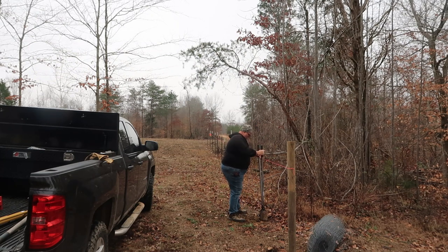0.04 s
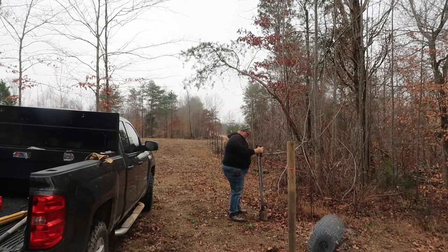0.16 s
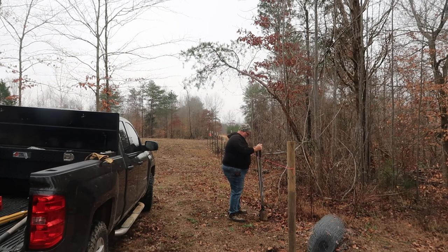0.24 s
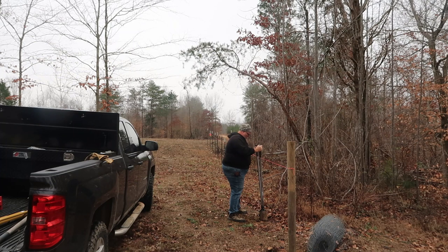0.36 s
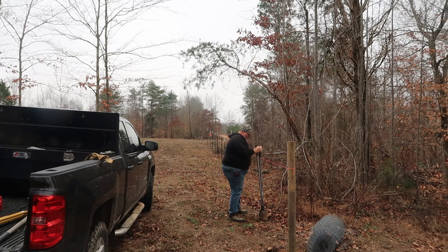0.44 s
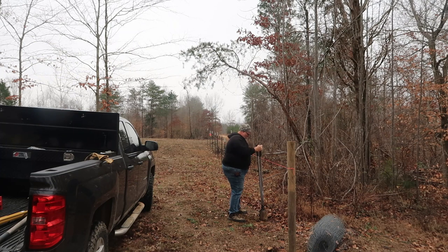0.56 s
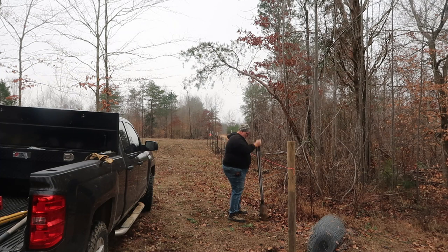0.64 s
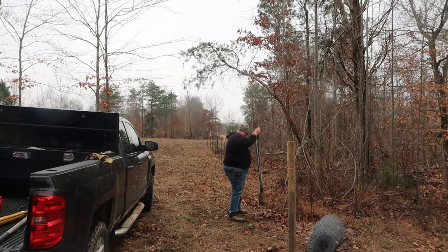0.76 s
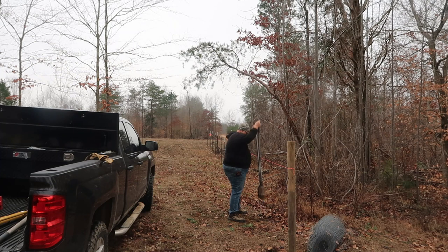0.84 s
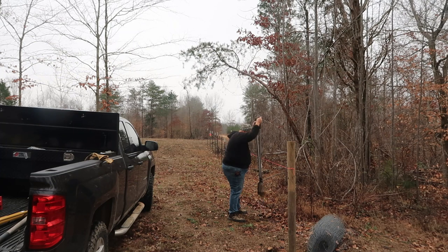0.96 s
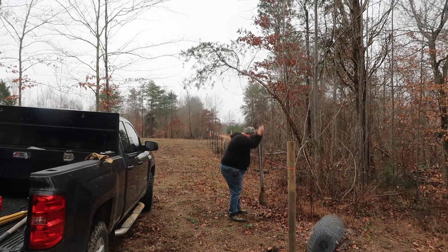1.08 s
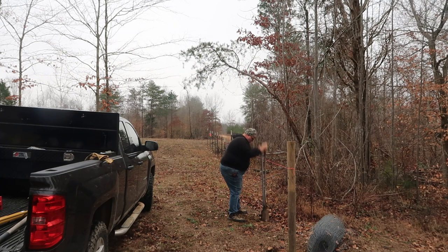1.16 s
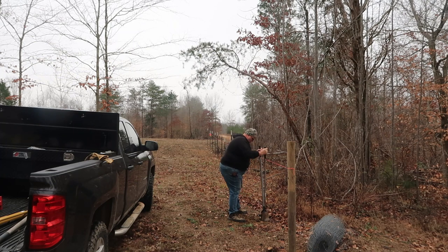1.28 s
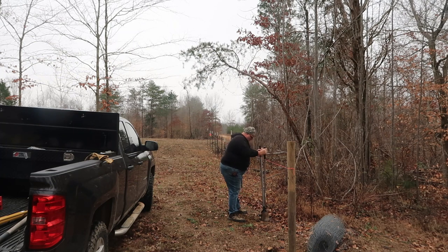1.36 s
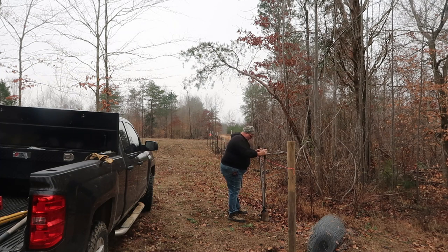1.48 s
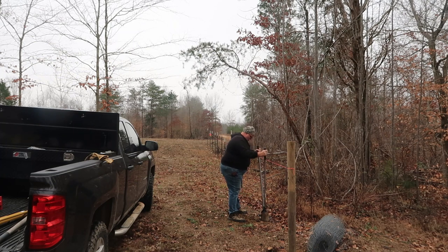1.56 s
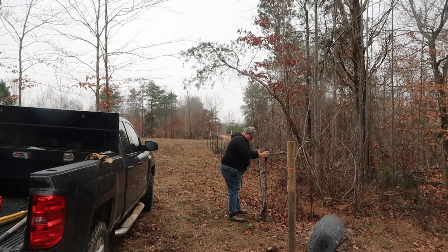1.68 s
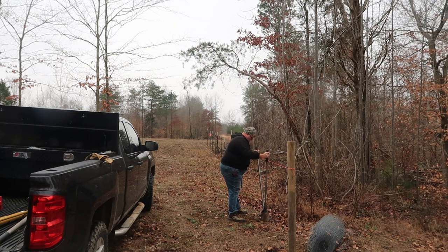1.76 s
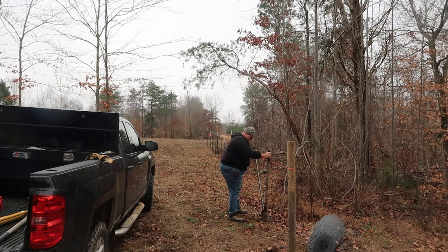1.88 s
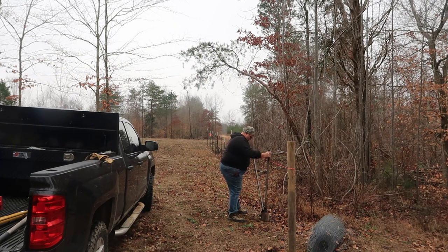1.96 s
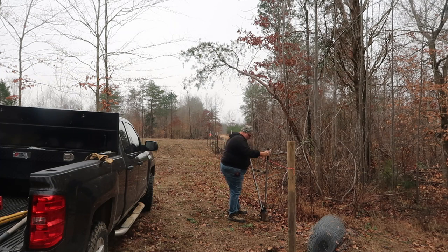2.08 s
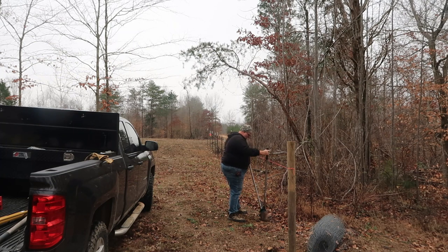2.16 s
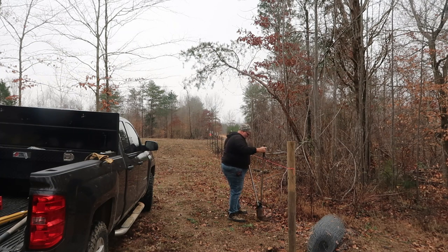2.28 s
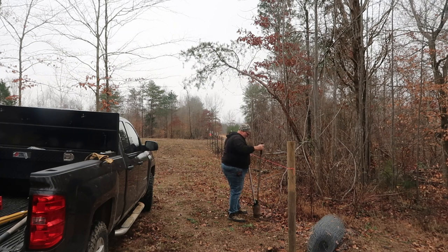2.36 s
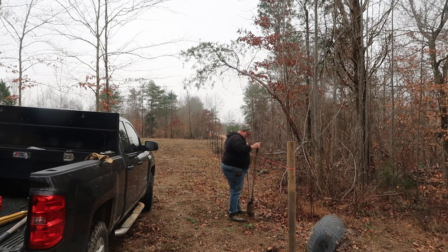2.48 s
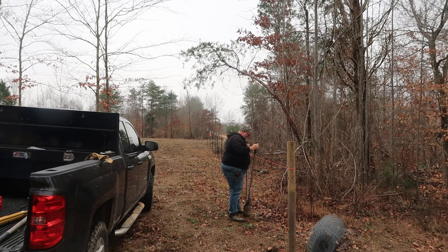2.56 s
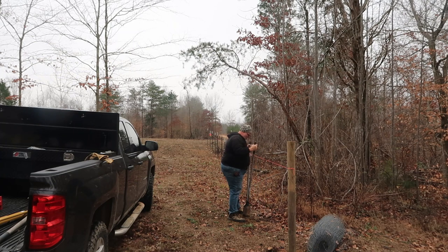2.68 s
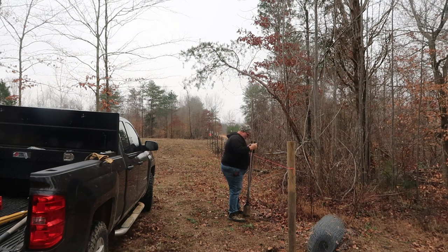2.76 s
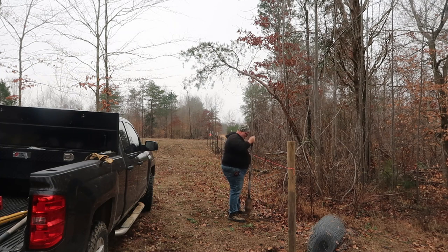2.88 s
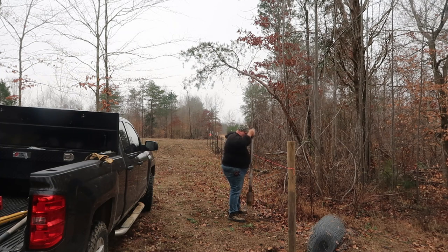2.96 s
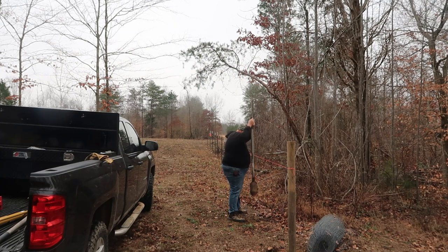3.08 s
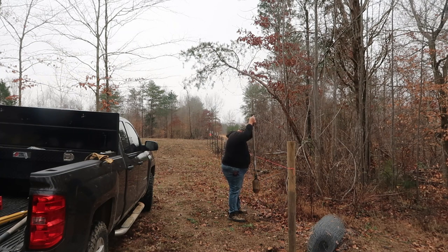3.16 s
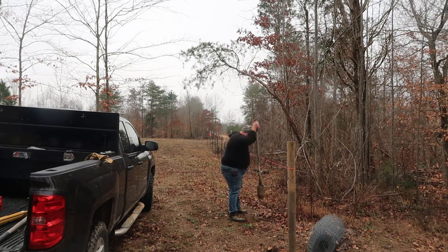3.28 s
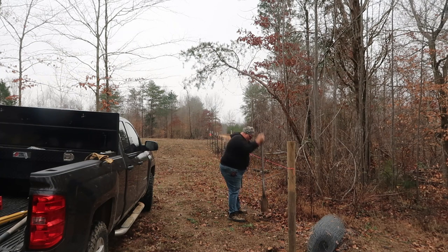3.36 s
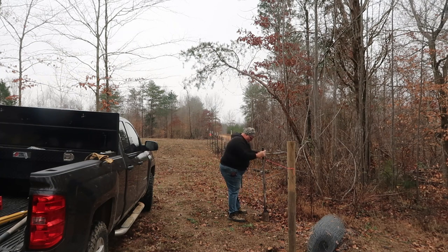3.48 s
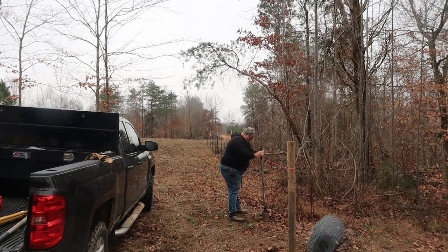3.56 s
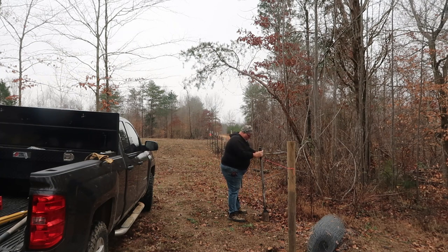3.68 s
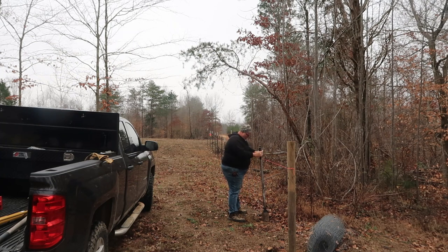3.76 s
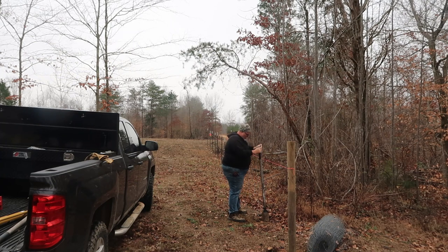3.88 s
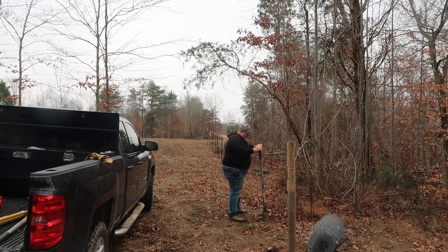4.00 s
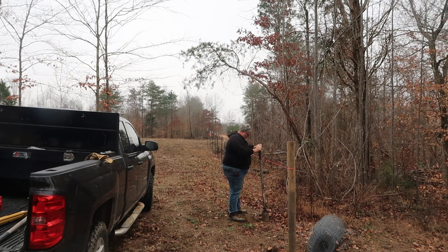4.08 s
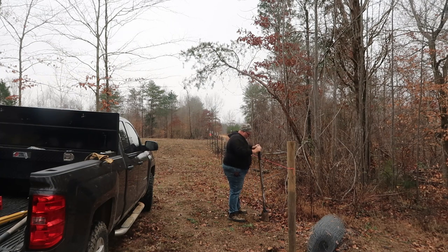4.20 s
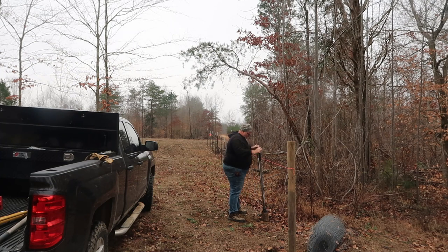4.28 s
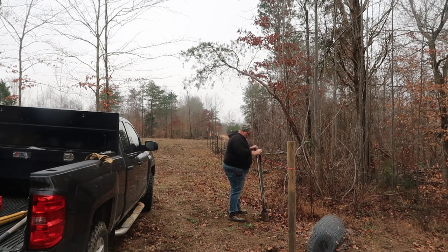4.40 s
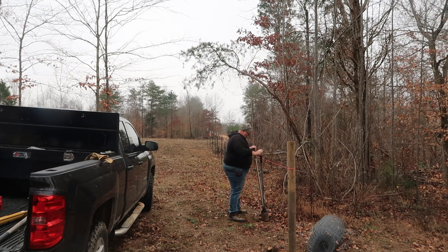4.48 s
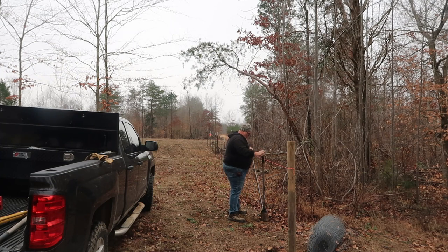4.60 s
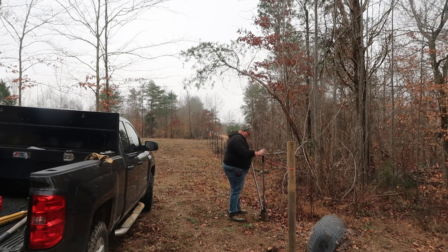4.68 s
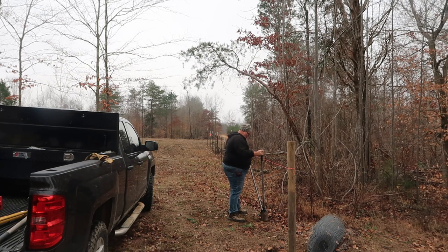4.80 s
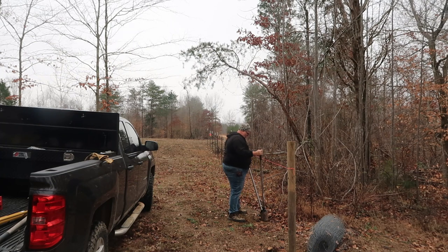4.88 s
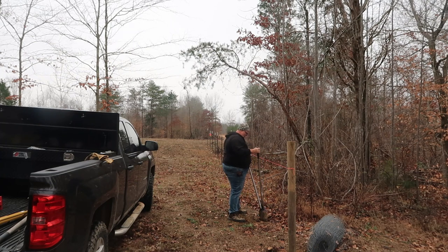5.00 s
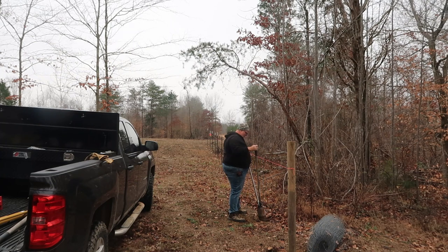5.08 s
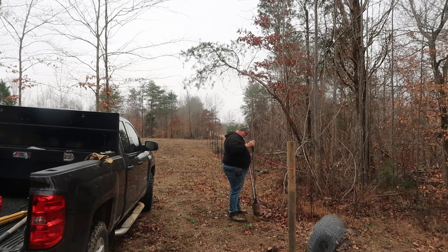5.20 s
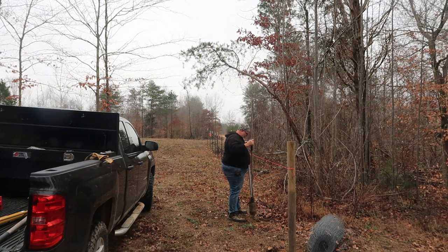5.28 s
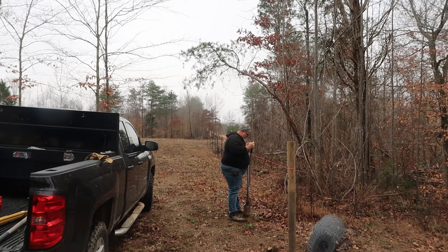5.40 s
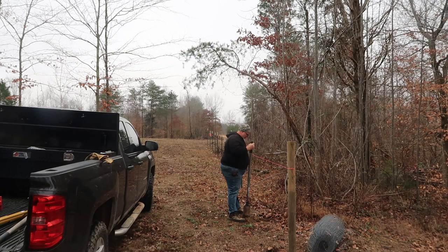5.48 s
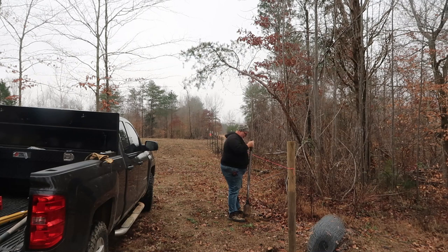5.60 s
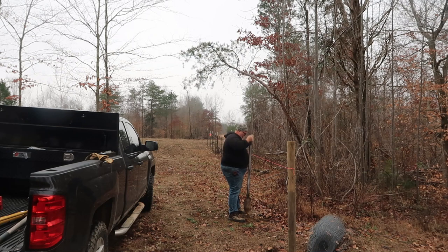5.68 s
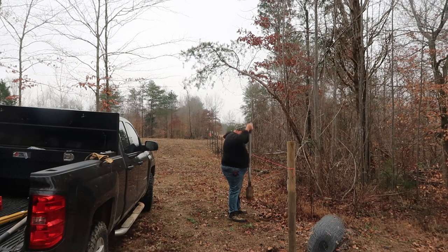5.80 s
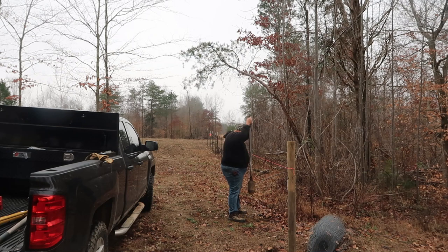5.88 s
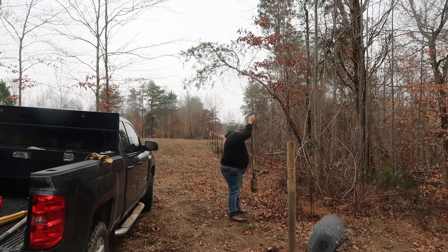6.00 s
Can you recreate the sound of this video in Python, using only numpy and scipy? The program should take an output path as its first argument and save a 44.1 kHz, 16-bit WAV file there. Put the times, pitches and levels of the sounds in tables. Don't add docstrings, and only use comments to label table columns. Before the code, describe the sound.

Sharp, gritty metal-on-stone blows at uneven intervals, each with short muffled blade rings, a low ground thump and a quick scattered echo from trees. After the blows the tool knocks and drags through soil, busiest after the deep third impact. A far bird whistles faintly over soft wind rumble and airy hush. Heard from several metres in open air, nearly central, with the loudest blow slightly clipped and the background dipping afterwards.

```python
import sys
import numpy as np
from scipy import signal
from scipy.fft import rfft, irfft, next_fast_len
from scipy.io import wavfile
from scipy.ndimage import uniform_filter1d

SR = 44100
rng = np.random.default_rng(int(sys.argv[2]) if len(sys.argv) > 2 else 0)


def unload_wav(signal):
    wavfile.write(
        sys.argv[1],
        SR,
        np.round(np.clip(np.atleast_2d(signal).T, -1, 1) * 32767).astype(np.int16),
    )


def ratio(d):
    e = np.asarray(d, float) / 20
    return 10 ** e


N = 266364
LEAD = SR // 5

# t/s, body peak level/dB, blade level over body/dB, time to the peak/s, drop after it/dB
DRY_BLOWS = [
    (-.06, 2.5, -3, .004, -11),
    (1.3028, 3, 2, .004, -10),
]
DEEP_BLOWS = [
    (3.551, -4, -3, .007, -18),
]
STABS = [
    (2.707, -18.5, 4, .013, -16),
    (5.548, -19.5, 5.5, .006, -12),
]
# body build-up/dB, settling time/s, crumble/(dB per s), grit level/dB, grit change/(dB per s)
DRY_SOIL = (-4, .0045, -300, -4, 60)
DEEP_SOIL = (-8, .006, -170, 2, 40)
LOOSE_SOIL = (-8, .010, -150, -4, 120)
# t/s, body level/dB, blade level over body/dB, length/s
GRAZES = [
    (2.683, -49.5, 9, .006),
    (2.692, -43, 10, .010),
    (3.544, -35, 9.5, 0.016),
    (5.53, -44, 9, .015),
]
# t/s, body peak level/dB, blade level over body/dB, grit level/dB
KNOCKS = [(0.21, -25, 1, -18), (0.233, -24.5, -12, -8), (1.895, -29, -6, -14), (1.919, -10.5, -20, -8),
          (1.933, -20.5, -15, -12), (2.060, -33.5, 3, -6), (2.229, -43, -7, -18), (4.218, -24, -15, -12),
          (4.278, -15, -6.5, -13), (4.334, -16.5, -2.5, -10), (4.345, -21, -12, -15), (4.356, -21, -9, -22),
          (4.421, -30, 1, -8), (4.456, -12, -14, -10), (4.463, -20, -1, -10), (4.499, -19.5, -22, -12),
          (4.513, -15.5, -19, -8), (4.525, -23, -15, -8), (4.539, -15.5, -7.5, -10), (4.555, -22, -10, -10),
          (4.577, -18.5, -12.5, -6), (4.702, -27.5, 1, -9)]
# t/s, body level/dB, blade level over body/dB
SCRAPES = [(.203, -29.5, -5), (.245, -39, -12), (.667, -29, -1), (.682, -35.5, -1.5), (1.075, -40, -25),
           (1.105, -45, -15), (1.885, -34, -7.5), (2.185, -52, 7), (2.245, -40, -4.5), (2.915, -48, 5.5),
           (3.145, -52.5, 3.5), (3.79, -48, -10), (4.365, -26.5, -4.5), (4.388, -47, 8), (4.657, -23, -9),
           (4.684, -40.5, 5), (5.075, -48.5, 5)]
# start t/s, length/s, body # level/dB, blade level over body/dB, change to the end/dB
DRAGS = [
    (1.143, 0.16, -54.5, 0.5, 10.5),
    (1.948, 0.089, -33, -13, -1),
    (2.14, 0.12, -65.5, 9.5, 4.5),
    (3.458, 0.06, -53.5, -9, 2),
    (4.227, 0.048, -42.5, -4, -5),
    (4.292, .04, -38, -2, 17),
    (4.428, .07, -33, -3.5, 2),
    (4.503, 0.076, -29.5, -13.5, 4),
    (4.583, 0.081, -35, -13, 0),
    (4.988, 0.074, -65, 12, 2),
]
# f/Hz, level/dB, time to fall 60 dB/s
BLADES_DRY = [(1141, -13, 0.047), (1247, -14, 0.024), (1386, -11, 0.032), (1979, -13.5, 0.044),
              (2158, -11, 0.055), (2470, -7.5, .03), (2890, -4.5, 0.04), (3190, 1.5, 0.014),
              (3500, -2, 0.028), (4343, -12, 0.055), (4580, -11, 0.0252), (5230, -20.5, 0.043),
              (7150, -22, 0.03)]
BLADES_DEEP = [(914, 5, 0.009), (1374, -8, 0.033), (1590, -7, 0.025), (2170, -5, 0.037), (2620, -8, 0.015),
               (2790, -5, 0.031), (3040, 1, 0.015), (3500, -0.5, 0.014), (3930, -8, 0.031),
               (4460, -7, 0.027), (4910, -12, 0.023), (7160, -17, 0.017)]
BLADES_STAB = [(1133, -8, 0.013), (1395, -8, 0.022), (1750, -6, 0.023), (1937, -8.5, 0.025),
               (2055, 0.5, 0.018), (2583, 2, 0.018), (2820, -6, 0.051), (3233, -4.5, 0.023),
               (3510, -14, 0.075), (3826, -14.5, 0.025), (4360, -16, 0.061), (7220, -24, 0.012)]
BLADES_LOOSE = [(1140, 0, 0.019), (1390, 2, 0.022), (1681, -3.5, 0.042), (1900, -2, 0.044),
                (2360, 1, 0.021), (2530, 0, 0.027), (2868, -3.5, 0.029), (3080, -3.5, .02),
                (3320, -4, 0.028), (3750, -6, .02), (4240, -7, 0.022), (4160, -18, .025)]
# f/Hz, level/dB, time to fall 60 dB/s
BODY = [(255, -10, 0.048), (315, -10, 0.08), (494.2, -3.5, 0.062), (546, 4, 0.0098), (698, -0.5, 0.05),
        (804, 4.5, 0.027)]
# t/s, pitch factor
LOAD = [(0, 0.91), (1.3, 1.0), (1.9, 0.98), (2.0, 0.91), (2.2, 0.97), (2.7, .93), (3.55, .98), (4.22, 0.82),
        (4.28, 1.02), (4.45, .95), (4.62, 0.883), (4.68, 1.036), (5.55, 0.97)]
# f/Hz, level/dB
CRACK = [(100, -45), (250, -17), (1000, -9), (3000, -1.5), (4600, -4), (6000, -9), (8000, -12.5),
         (10000, -25), (13000, -23.5), (16000, -32)]
# f/Hz, level/dB
GRIT = [(100, -50), (250, -22), (1000, -3), (3000, 0), (4600, -4), (5400, -16), (7500, -16), (10000, -26),
        (12000, -24), (16000, -34)]
# t/s, level/dB, f/Hz, time to fall 60 dB/s
SHAFT = [
    (-.02, -37, 577, 0.66),
    (1.312, -34, 587, 0.23),
    (3.565, -38, 575, 0.26),
]
# t/s, peak level/dB, f/Hz, time to fall 60 dB/s
THUMPS = [
    (-.03, -26.5, 84, 0.29),
    (1.313, -15, 79.3, 0.28),
    (3.569, -5.5, 78.6, 0.086),
    (3.595, -27, 75, 0.46),
    (3.64, -47.5, 136.6, 0.61),
    (4.33, -41, 88, 0.27),
    (5.559, -43.5, 75.7, 0.18),
]
# f/Hz, level/dB
SPRAY = [(100, -26.5), (300, -4), (700, -1.5), (1500, -2), (3000, -2), (5000, -10), (8000, -13),
         (10000, -35), (16000, -51.5)]
# f/Hz, time to fall 60 dB/s
TREES = [(100, .3), (400, 0.93), (1500, 0.6), (4000, 0.79), (8000, 0.52), (15000, 0.21)]
# f/Hz, likeness (1 = same)
TREES_SAME = [(60, 1), (180, 0.5), (550, 1), (1650, 0.93), (4970, 0.94), (15000, 0.082)]
# start t/s, length/s, first pitch f/Hz, rise share, top level/dB
BIRD = [
    (.87, .062, 1360, .18, -57),
    (.942, .05, 1415, .01, -51.5),
    (1.228, .055, 1370, .17, -52),
    (2.297, .12, 1334, 0.18, -55),
    (2.969, 0.03, 1450, -.06, -57),
    (2.16, .11, 2480, .012, -61),
    (5.0, 0.14, 2470, 0.015, -61),
]
# f/Hz, level/dB per Hz
WIND = [(15, -22), (30, 5), (50, 4), (65, 9.5), (100, -2.5), (150, -6), (250, -37)]
# t/s, level/dB
GUSTS = [(0, -53), (.6, -56.5), (1, -53.5), (1.5, -56), (2.4, -52.5), (3.5, -54.5), (4.5, -52.5),
         (6.04, -54.5)]
# f/Hz, level/dB per Hz
AIR = [(71, -32.5), (120, -9.5), (250, -7.5), (500, -10), (1280, -15), (4550, -23), (10300, -38.5),
       (13400, -43.5), (15800, -58)]
# f/Hz, likeness (1 = same, below 0 = opposed)
AIR_SAME = [(60, 1), (180, 0.26), (550, -0.06), (1650, 0.27), (4970, -0.18), (15000, -0.4)]


def bites(blows, soil):
    build_db, settle_s, crumble_db_per_s, grit_db, grit_db_per_s = soil
    gap = .004 * 1.35 ** np.arange(7)
    t = np.cumsum(gap) - gap
    rows = []
    for s, db, blade_db, peak_s, drop_db in blows:
        short_db = build_db * np.maximum(1 - t / peak_s, 0)
        after = np.maximum(t - peak_s, 0)
        settled = 1 - np.exp(-(after / settle_s) ** 2)
        body_db = db + short_db + drop_db * settled + crumble_db_per_s * after
        over_db = blade_db - .5 * short_db - 70 * after
        rows += zip(s + t, body_db, over_db, .72 * gap, grit_db + grit_db_per_s * t)
    return rows


def slips(grit_db):
    part = np.arange(4) / 4
    rows = []
    for s, length, db, blade_db, change_db in DRAGS:
        early, strong = rng.uniform(-1, 1, (2, 4))
        start = s + length * (part + 0.069 * early)
        body_db = db + change_db * part + 6 * strong
        rows += [(a, b, blade_db, .7 * length / 4, grit_db) for a, b in zip(start, body_db)]
    return rows


def contacts(rows, blades, stones, spread_db, soft):
    out, bare = np.zeros((2, N + LEAD))
    grit = colour(stones)
    for s, body_db, blade_db, length, grit_db in rows:
        t = np.arange(3000) / SR / np.clip(length, .0005, .03)
        side, size, chance = rng.random((3, 3000))
        sign = np.sign(side - .5)
        clicks = sign * ratio(-3.0 * np.log(size + 0.0017)) * (chance < .25)
        clicks[0] = 3.6 * (1 - soft)
        clicks *= np.exp(-(t - soft) ** 2 * (1 + soft))
        pitch = np.interp(s, *np.transpose(LOAD))
        body = ring(np.multiply(BODY, [pitch, 1, 1]), spread_db)
        blade = ring(blades, spread_db)
        over_db = body_db + blade_db
        for answer, db in (body, body_db), (blade, over_db), (grit, over_db + grit_db):
            sound = signal.fftconvolve(clicks, answer)[:5000]
            add(out, s, ratio(db) * sound / abs(sound).max())
        add(bare, s, ratio(body_db + max(blade_db, 0)) * sign[:1])
    return np.array([out, bare])


def ring(modes, spread_db):
    hz, db, t60 = np.transpose(modes)[:, :, None]
    t60 = np.minimum(t60, .07)
    louder, higher = rng.standard_normal((2, len(modes), 1))
    t = np.arange(3072) / SR
    level = ratio(db + spread_db * louder - 60 * t / t60)
    sines = level * np.sin(2 * np.pi * hz * (1 + 0.017 * higher) * t)
    return sines.sum(0) * (1 - np.exp(-(t / 0.00015) ** 2))


def colour(points):
    gain = np.log(ratio(read(points, abs(np.fft.fftfreq(2048, 1 / SR)))))
    return np.fft.ifft(np.exp(signal.hilbert(gain).conj())).real[:512]


def tool_strikes():
    dry_blows = contacts(bites(DRY_BLOWS, DRY_SOIL), BLADES_DRY, CRACK, 0.91, soft=0)
    deep_blows = contacts(bites(DEEP_BLOWS, DEEP_SOIL), BLADES_DEEP, CRACK, 0.94, soft=0.17)
    grazes = [(*row, -2) for row in GRAZES]
    stabs = contacts(bites(STABS, LOOSE_SOIL) + grazes, BLADES_STAB, GRIT, 1.2, soft=0.5)
    knock_s, scrape_s, scrape_grit_db = .0016, .0098, -3
    knocks = [(*row, knock_s, grit_db) for *row, grit_db in KNOCKS]
    scrapes = [(*row, scrape_s, scrape_grit_db) for row in SCRAPES] + slips(scrape_grit_db)
    loose = contacts(knocks, BLADES_LOOSE, GRIT, 1.6, soft=0)
    loose += contacts(scrapes, BLADES_LOOSE, GRIT, 1.6, soft=.8)
    tool, bare = dry_blows + deep_blows + stabs + np.roll(loose, 90, axis=1)
    no_bass = signal.butter(5, 200, "high", fs=SR, output="sos")
    return signal.sosfilt(no_bass, tool), bare


def shaft():
    out, t = np.zeros(N + LEAD), np.arange(SR // 2) / SR
    for s, db, hz, t60 in SHAFT:
        waver = 1 + .5 * evened(uniform_filter1d(rng.standard_normal(len(t)), size=700))
        add(out, s, ratio(db - 60 * t / t60) * waver * np.sin(2 * np.pi * hz * t))
    return out


def ground():
    out, t = np.zeros(N + LEAD), np.arange(SR // 2) / SR
    for s, db, hz, t60 in THUMPS:
        turns = hz * (t + 0.0032 * (1 - np.exp(-t / 0.012)))
        uneven = evened(uniform_filter1d(rng.standard_normal(len(t)), size=900))
        lumps = 1 + 0.35 * uneven * np.minimum(t / 0.039, 1)
        level = ratio(db - 60 * t / t60) * (1 - np.exp(-t / 0.00055))
        add(out, s, level * lumps * np.sin(2 * np.pi * turns))
    return out


def ports(x, lag_samples, right_db):
    size = next_fast_len(len(x))
    turn = np.exp(-1j * np.pi * np.fft.rfftfreq(size) * lag_samples)
    sides = np.array([turn / ratio(right_db), ratio(right_db) / turn])
    return irfft(rfft(x, size) * sides, size)[:, :len(x)]


def trees(x):
    taps = np.zeros((2, SR))
    at = np.arange(700, SR - 20, 20) + rng.integers(0, 20, (2, (SR - 701) // 20))
    np.put_along_axis(taps, at, rng.choice([-1., 1.], at.shape), 1)
    hz, t, z = signal.stft(taps, SR, nperseg=256)
    like = np.clip(read(TREES_SAME, hz), -1, 1)[:, None]
    z[1] = like * z[0] + np.sqrt(1 - like ** 2) * z[1]
    fade = ratio(-60 * t / read(TREES, hz)[:, None])
    tail = signal.istft(z * fade, SR, nperseg=256)[1]
    return signal.fftconvolve(x[None], tail / np.linalg.norm(tail[0]), axes=1)[:, :len(x)]


def bird():
    out = np.zeros(N + LEAD)
    for s, length, hz, rise, db in BIRD:
        flutter = uniform_filter1d(rng.standard_normal(SR // 4), size=200)
        t = np.arange(0, length, 1 / SR)
        swell = np.sin(np.pi * t / length)
        pitch = hz * (1 + rise * np.sin(np.pi * t / .12)) * (1 + .1 * flutter[:len(t)])
        tone = np.sin(2 * np.pi * np.cumsum(pitch) / SR)
        level = np.sqrt(2) * ratio(db - 7 * (1.5 - swell))
        add(out, s, level * tone * signal.windows.tukey(len(t), .4))
    return out


def wind():
    s, gust_db = np.transpose(GUSTS)
    gusts = ratio(np.interp(np.arange(N) / SR, s, gust_db))
    return gusts * noise(WIND, [(20, .999), (300, 1.0)], size=2048, patchy_db=2.0, swell_db=0.0)


def air():
    return ratio(-53) * noise(AIR, AIR_SAME, size=512, patchy_db=0.6, swell_db=0.96)


def whine():
    return ratio(-91) * np.sin(2 * np.pi * 13022 * np.arange(N) / SR)


def noise(points, same, size, patchy_db, swell_db):
    frames, hz = N // (size // 4) + 5, np.fft.rfftfreq(size, 1 / SR)
    a, b, c, d, patches = rng.standard_normal((frames, len(hz), 5)).T
    swell = evened(uniform_filter1d(patches[0], size=12))
    patches = uniform_filter1d(patches, size=10, axis=0)
    patches = evened(uniform_filter1d(patches, size=10, axis=1))
    like = np.clip(read(same, hz), -1, 1)[:, None]
    left = a + 1j * b
    right = like * left + np.sqrt(1 - like ** 2) * (c + 1j * d)
    level = ratio(read(points, hz)[:, None] + patchy_db * patches + swell_db * swell)
    z = np.array([left, right]) * level
    return evened(signal.istft(z, nperseg=size, noverlap=size - size // 4)[1][:, :N])


def evened(x):
    return x / np.sqrt(np.mean(x ** 2) + 1e-20)


def read(points, hz):
    f, value = np.transpose(points)
    return np.interp(np.log(hz + 1), np.log(f + 1), value)


def add(mix, s, sound):
    part = mix[LEAD + round(s * SR):][:len(sound)]
    part += sound[:len(part)]


def scene():
    tool, bare = tool_strikes()
    song = bird()
    near = ports(tool + shaft() + ground() + song, lag_samples=1.15, right_db=.2)
    spray = signal.fftconvolve(bare, evened(colour(SPRAY)))[:len(bare)]
    near += trees(ratio(-33.5) * spray + ratio(-9.0) * song)
    return near[:, LEAD:] + wind() + air() + whine()


def low_pass(x):
    return signal.sosfilt(signal.butter(12, 15950, fs=SR, output="sos"), x)


def record(dry):
    bass_cut = signal.butter(2, 40, "high", fs=SR, output="sos")
    dry = signal.sosfilt(bass_cut, dry)
    power = abs(uniform_filter1d((dry ** 2).mean(0), size=400))
    power_db = 10 * np.log10(power + 1e-12)
    power_db[0] = -4.0
    fall_db = np.arange(N) * 6.94 / SR
    held_db = np.maximum.accumulate(power_db + fall_db) - fall_db
    over_db = np.maximum(held_db + 12.5, 0)
    late_db = signal.lfilter([.002], [1, -.998], over_db, zi=[over_db[0]])[0]
    ducked = np.clip(dry / ratio(0.81 * late_db), -.98, .98)
    treble_cut = signal.firwin(255, 15400, fs=SR)
    mix = signal.oaconvolve(ducked, treble_cut[None], "same")
    return low_pass(mix)


dry = scene()
out = record(dry)
unload_wav(out)
```